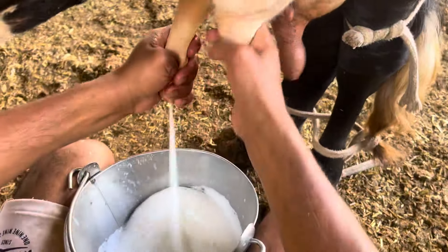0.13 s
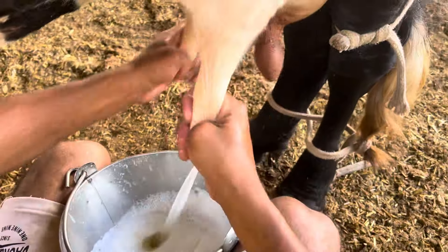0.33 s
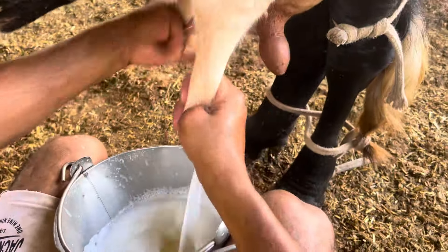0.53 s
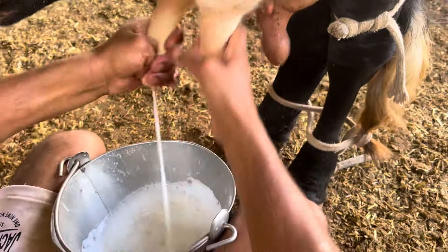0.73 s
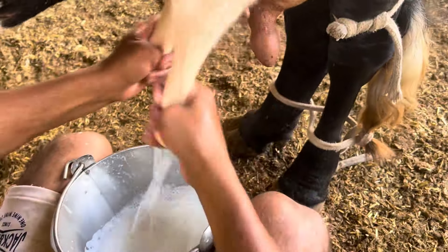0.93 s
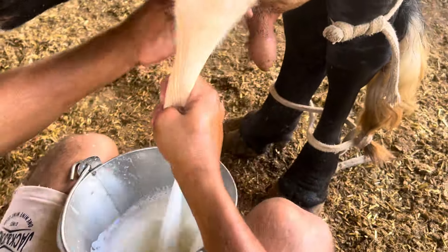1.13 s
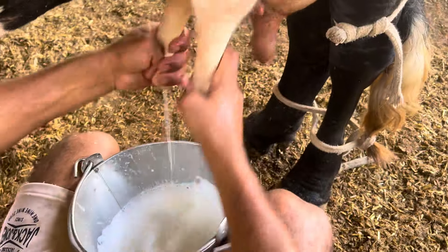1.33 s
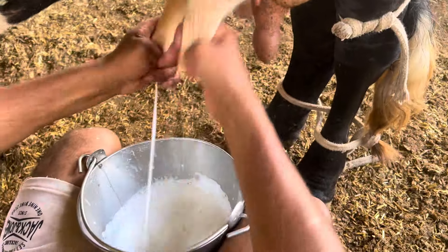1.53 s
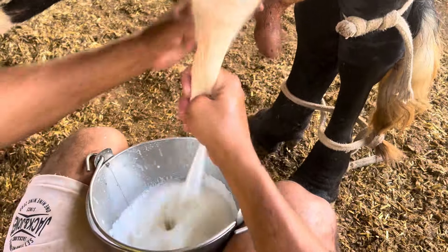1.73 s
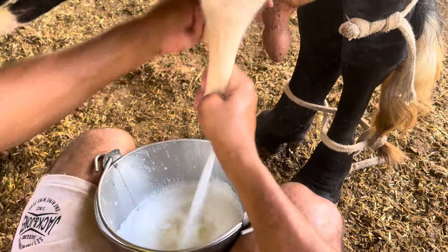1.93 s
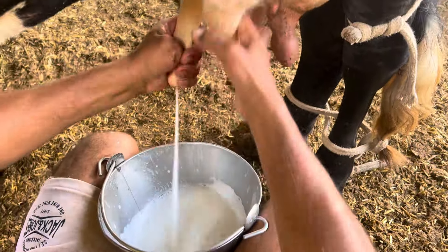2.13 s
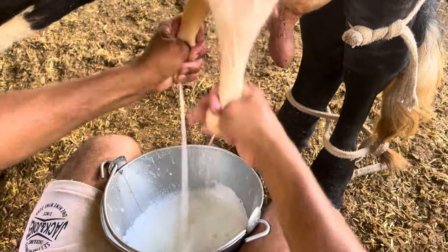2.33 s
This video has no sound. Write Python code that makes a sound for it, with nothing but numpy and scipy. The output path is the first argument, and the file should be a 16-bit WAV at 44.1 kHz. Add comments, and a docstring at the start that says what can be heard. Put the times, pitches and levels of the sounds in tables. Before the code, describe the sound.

Milk jets squirt by hand into a frothy steel pail, fizzing and gurgling in steady alternating spurts

```python
"""The fizz of a milk jet in froth comes first, with a brief graze on steel: a cow is milked by hand into a pail.
Two hands take turns; droplets, bursting bubbles and ticks are shaped noise and damped tones.
Air dragged into the milk gurgles and plops as damped sines of rising pitch; slaps are short noise bursts.
A few thin chirps, a faint ring of metal and soft thuds are sines, over low murmuring air of filtered noise.
"""
import sys
import numpy as np
from scipy import signal
from scipy.fft import rfft, irfft, next_fast_len
from scipy.io import wavfile
from scipy.ndimage import uniform_filter1d

SR = 44100
rng = np.random.default_rng(int(sys.argv[2]) if len(sys.argv) > 2 else 0)


def bounce(signal):
    """Save signal as a 16-bit WAV file at the path given by the first command-line argument."""
    frames = np.transpose(np.atleast_2d(signal))
    limited = np.clip(frames, -1, 1)
    pcm = np.round(limited * 32767).astype(np.int16)
    wavfile.write(sys.argv[1], SR, pcm)


N = 108706
T = np.arange(N) / SR
SIZE = 2 * next_fast_len(N // 2 + SR // 4)  # padded transform length
HZ = np.maximum(np.arange(SIZE // 2 + 1) * SR / SIZE, 1)

# Jets of each hand. Each row: start in seconds, squeeze in seconds, fizz level in dB, gurgle level in dB.
LEFT_JETS = [(-.03, 0.23, -26.5, -35.5), (0.679, 0.17, -29, -31.5), (1.365, 0.13, -28.5, -35),
             (2.078, 0.21, -29, -31.5)]
RIGHT_JETS = [(.28, 0.22, -27.5, -30.5), (.935, 0.22, -27.5, -31.5), (1.635, 0.25, -27.5, -32.5),
              (2.37, .25, -30, -30)]
# Each grip: attack in seconds, seconds for the fizz to fall 20 dB, seconds for the gurgle to fall 20 dB,
# share of the jet that is there at once.
LEFT_GRIP = (0.062, 0.12, 0.2, 0.22)
RIGHT_GRIP = (0.13, 0.14, 0.15, 0.27)
RELEASE_BEND = 1.57  # exponent; above 1, the jet dies ever faster

# Colour of each hand's fizz. Each row: frequency in Hz, relative level in dB.
LEFT_FIZZ = [(300, -16.5), (780, -2), (960, -6.5), (1200, -6.5), (1450, -6), (1750, -2.5), (2100, -11),
             (2600, -0.5), (3200, -7.5), (4200, -5), (5500, -3), (6900, -3.5), (8400, 0)]
RIGHT_FIZZ = [(300, 0), (780, -7), (960, 2), (1200, 0.5), (1450, -3.5), (1750, -6), (2100, -1.5),
              (2600, -5), (3200, -3), (4200, -1), (5500, 1.5), (6900, 0), (8400, 3.5)]
DROPS_PER_S, DROP_SPREAD_DB = 8000, 4
SPUTTER_DB, SPUTTER_HZ = 1.5, 57  # depth and corner rate of the clumping
FROTH_DB, FROTH_HZ = 2, 12  # depth and corner rate of the swell in each band

# Small bubbles that ring as they burst in the froth; level relative to the droplets
BURSTS_PER_S, BURST_DB, BURST_SPREAD_DB = 700, -6, 3
BURST_T60_S, BURST_LOW_HZ, BURST_HIGH_HZ = 0.13, 817, 4518
# Stray drops that tick in the foam; level relative to the droplets, rise as for BUBBLE_RISE
TICKS_PER_S, TICK_DB, TICK_SPREAD_DB = 170, -9.5, 3
TICK_LOW_HZ, TICK_HIGH_HZ, TICK_CYCLES, TICK_RISE = 1300, 6000, 12, 0.15

# Colour of the spit that opens a left-hand jet. Each row: frequency in Hz, relative level in dB.
SPIT_COLOUR = [(500, -12), (2000, -4), (8500, 0)]
SPIT_DB, SPIT_T60_S = -39, 0.025

# The first jet grazes the steel wall. The row: start in seconds, length in seconds, level in dB.
GRAZE = (0.017, 0.16, -33)
# The band the graze stirs. Each row: frequency in Hz, relative level in dB.
GRAZE_COLOUR = [(1800, -17), (2300, -5), (2560, 6), (2900, 0), (3400, -12), (4500, -31)]

# Steel wall modes stirred by the spray. Each row: frequency in Hz, relative level in dB, T60 in seconds.
WALL_MODES = [(956, -8, 0.11), (1047, -5, 0.13), (1769, -2, 0.16), (2312, -10.5, 0.059),
              (2452, -16.5, 0.062), (2600, -2, 0.63), (4080, -2, 0.43)]
PAIL_T60_S, PAIL_ECHO_DB = 0.15, -5

# Air in the pail, colouring the bubbles. Each row: frequency in Hz, relative level in dB.
PAIL_AIR = [(90, -4), (140, -21.5), (171, -1.5), (200, -15), (240, -2.5), (287, 2.5), (345, -3.5),
            (410, -1), (460, -2), (520, -2), (620, -10.5), (760, -20), (1200, -34)]
GURGLE_LAG_S = 0.0051  # the gurgle follows the jet
BUBBLES_PER_S, BUBBLE_SPREAD_DB = 1300, 5
BUBBLE_CYCLES = 7.4  # life of a bubble in cycles of its starting pitch
BUBBLE_RISE = 0.079  # half the fractional rise in pitch over that life

# Large trapped bubbles. Each row: start in seconds, starting pitch in Hz, level in dB.
PLOPS = [(0.073, 270, -14), (0.152, 460, -14.5), (0.426, 380, -30), (0.536, 270, -17.5), (0.749, 508, -9),
         (.7485, 690, -15.5), (0.754, 285, -17), (0.776, 370, -14), (.778, 268, -19.5), (0.794, 276, -17),
         (0.816, 283, -19.5), (0.838, 288, -24), (1.094, 288, -16), (1.405, 470, -19), (1.451, 247, -15.5),
         (1.503, 252, -22), (2.191, 268, -17.5), (2.25, 485, -11), (2.425, 300, -19)]
PLOP_CYCLES, PLOP_RISE = 12.7, 0.25  # as for the bubbles

# Sharp slaps of milk on the surface. Each row: start in seconds, level in dB.
SLAPS = [(.049, -29), (0.715, -18), (.724, -29), (0.7457, -21), (0.757, -26), (.778, -27), (1.0466, -27),
         (1.165, -34), (1.415, -29), (1.4508, -22.5), (1.4956, -16.5), (1.5, -17), (1.54, -27.5),
         (1.585, -31), (1.814, -27), (2.108, -33)]
# Colour of the slaps. Each row: frequency in Hz, relative level in dB.
SLAP_COLOUR = [(300, -4.5), (750, -13.5), (1200, -8), (1800, 3.5), (2600, -1.5), (3400, 4), (4500, -22),
               (12000, -13)]
SLAP_T60_S, SLAP_ATTACK_S, SLAP_ECHO_DB = 0.021, 0.0008, -7

# Thin chirps. Each row: start in seconds, length in seconds, start, middle and end pitch in Hz, level in dB.
CHIRPS = [(.534, .022, 5640, 5720, 5900, -29), (.565, .016, 4500, 4530, 4480, -32.5),
          (.611, .044, 3650, 4520, 5050, -40), (.642, .018, 4020, 3800, 3680, -44),
          (.648, .018, 5050, 4850, 4600, -45)]
# Echoes of the chirps. Each row: delay in seconds, relative level in dB.
CHIRP_ECHOES = [(.019, -14), (.034, -13)]
CHIRP_WAVER, CHIRP_FLUTTER_DB = 0.012, 2  # spread of pitch (fraction) and of level

# Two close modes of a piece of metal. Each row: frequency in Hz, relative level in dB, T60 in seconds.
RING_MODES = [(4206, -7, 1.2), (4250, 0, .35)]
# Light touches that set it ringing. Each row: start in seconds, level in dB.
RINGS = [(0, -43), (.5, -50), (1.314, -42), (1.578, -46)]
RING_ATTACK_S = 0.008

# Soft thuds. Each row: start in seconds, level in dB.
THUDS = [(0.85, -28.5), (0.914, -33), (0.949, -37), (1.002, -39)]
THUD_HZ, THUD_S = 69.7, 0.062

# Colour of the yard's air. Each row: frequency in Hz, relative level in dB.
YARD = [(25, -42), (45, -14.5), (68, 5), (120, 2), (300, -1), (520, -1.5), (800, -17.5), (2000, -15.5),
        (5000, -24.5), (15000, -40)]
YARD_DB = -47

# Likeness of the two microphones. Each row: frequency in Hz, correlation from 0 to 1.
LIKENESS = [(300, 1), (600, 1), (900, 0.53), (3000, 0.15), (4200, 0.84), (6500, 0.16), (8500, 1),
            (15000, 1)]
# Balance of the two microphones. Each row: frequency in Hz, left minus right in dB.
BALANCE_DB = [(500, -1), (950, 5.5), (1400, 0.5), (2600, 3), (4000, 3), (5200, 7.5), (6800, 10.5),
              (7800, 0), (15000, -0.5)]
# Phase between the two microphones. Each row: frequency in Hz, lead of the left in radians.
PORT_PHASE = [(150, 0), (500, .55), (750, 1.4), (1000, .5), (1700, 1.9), (2700, 1.4), (3600, .2),
              (6000, .5), (7300, 1.1), (8500, 0), (9400, -1.2), (10000, -2.8), (10700, -3.5), (11500, -5.6),
              (12800, -7), (13400, -9), (14200, -9.8), (15300, -12.2)]
# Treble response of the microphones. Each row: frequency in Hz, gain in dB.
TREBLE = [(8500, 0), (10200, -5), (11300, -8), (12500, -9), (15500, -8)]
CUTOFF_HZ = 15900


def amp(db):
    """A level in decibels is a logarithmic measure of amplitude gain."""
    return 10 ** (np.asarray(db) / 20)


def unit(x):
    """Root-mean-square normalisation gives every signal the same power."""
    return x / np.sqrt(np.mean(x ** 2) + 1e-20)


def decay(t, t60):
    """Exponential damping: the amplitude falls by 60 dB in t60."""
    return np.exp(-np.log(1000) * t / t60)


def across(points):
    """Interpolation on a logarithmic frequency axis extends (Hz, value) rows to every frequency."""
    hz, value = np.transpose(points)
    return np.interp(np.log(HZ), np.log(hz), value)


def colour(x, points):
    """Minimum-phase filtering: a folded cepstrum gives a causal response of unit power gain."""
    gain = amp(across(points))
    cepstrum = irfft(np.log(unit(gain)))
    cepstrum[1:SIZE // 2] *= 2
    cepstrum[SIZE // 2 + 1:] = 0
    response = np.exp(rfft(cepstrum))
    return irfft(rfft(x, SIZE) * response)[..., :N]


def drift(rate):
    """Low-passed noise is a slow random fluctuation, here of unit spread; rate is the corner in Hz."""
    noise = rfft(rng.standard_normal(SIZE))
    return unit(irfft(noise / (1 + (HZ / rate) ** 2))[:N])


def add(out, s, sound):
    """Superposition: a sound adds linearly to the mix from its start time."""
    i = int(np.clip(s * SR, 0, N))
    out[i:i + len(sound)] += sound[:N - i]


def flow(jets, grip, release, lag, axis):
    """Powers of successive jets add; each builds, holds and dies. Axis picks the level column."""
    power, attack, first = 0, grip[0], np.clip(grip[3], 0, 1)
    for row in jets:
        t = T - row[0] - lag
        build = np.sin(np.pi / 2 * np.clip(t / attack, 0, 1)) ** 2
        rise = (t > 0) * (first + (1 - first) * build)
        fall_db = 20 * (np.maximum(t - row[1], 0) / release) ** RELEASE_BEND
        power = power + (rise * amp(row[axis] - fall_db)) ** 2
    return np.sqrt(power)


def bubble(hz, cycles, rise):
    """A bubble is a damped oscillator whose pitch rises as it nears the surface."""
    t = T[:int(cycles / hz * SR)]
    age = t * hz / cycles
    tone = np.sin(2 * np.pi * hz * t * (1 + rise * age))
    onset = 1 - np.exp(-2 * hz * t)
    return tone * decay(age, 1) * onset


def pail(x):
    """Reverberation: reflections from steel walls and moving froth smear power into a decaying wash."""
    keep = np.exp(-2 * np.log(1000) / (PAIL_T60_S * SR))
    power = signal.lfilter([1 - keep], [1, -keep], x ** 2 + 1e-18)
    return np.sqrt(power) * rng.standard_normal(N)


def in_pail(x, spectrum):
    """A spray splits into a direct and a diffuse field, both coloured by where it lands."""
    echo = amp(PAIL_ECHO_DB)
    direct = (x + echo * pail(x)) / np.hypot(1, echo)
    return colour(np.array([direct, pail(x)]), spectrum)


def fizz(jets, grip, spectrum):
    """Impulsive noise: the jet breaks into droplets that burst the froth in sputtering clumps."""
    spread_db = DROP_SPREAD_DB * np.minimum(rng.exponential(1, N), 4)
    sizes = amp(spread_db) * rng.choice([-1, 1], N)
    landed = rng.random(N) < DROPS_PER_S / SR
    drops = unit(sizes * landed * amp(SPUTTER_DB * drift(SPUTTER_HZ)))
    level = flow(jets, grip, grip[1], 0, axis=2) / np.hypot(1, amp(BURST_DB))
    # Independent spatter for the direct and the diffuse field
    spatter = np.array([amp(BURST_DB) * bursts() + amp(TICK_DB) * ticks() for _ in range(2)])
    return in_pail(level * drops, spectrum) + colour(level * spatter, spectrum)


def bursts():
    """Free vibration: small bubbles pop in the froth, each with a brief damped note of its own."""
    out, t = np.zeros(N), T[:SR // 20]  # each note stops after 50 ms
    envelope = decay(t, BURST_T60_S)
    for k, (pitch, size, delay) in enumerate(rng.random((N // 16, 3))):
        s = (k + delay) / BURSTS_PER_S
        if s < T[-1]:
            hz = BURST_LOW_HZ + (BURST_HIGH_HZ - BURST_LOW_HZ) * pitch
            level = amp(-BURST_SPREAD_DB * np.log(size + 0.02))
            add(out, s, level * envelope * np.sin(2 * np.pi * hz * t))
    return unit(out)


def ticks():
    """Bubble resonance: stray drops land one by one, each a tiny wet tick that rises in pitch."""
    out = np.zeros(N)
    for when, pitch, size in rng.random((int(TICKS_PER_S * N / SR), 3)):
        hz = TICK_LOW_HZ * (TICK_HIGH_HZ / TICK_LOW_HZ) ** pitch
        level = np.sqrt(hz) * amp(-TICK_SPREAD_DB * np.log(size + 0.04))
        add(out, when * N / SR, level * bubble(hz, TICK_CYCLES, TICK_RISE))
    return unit(out)


def froth(x):
    """Band-wise modulation: each narrow band swells and sinks on its own as the foam shifts."""
    centres = np.geomspace(700, 11000, 24)  # Hz
    spectrum = rfft(x, SIZE)
    out = 0
    for pick in np.eye(len(centres)):
        band = irfft(spectrum * across(list(zip(centres, pick))))[:, :N]
        out = out + band * amp(FROTH_DB * drift(FROTH_HZ))
    return out


def spits():
    """Transient noise: a left-hand jet that starts after time zero spits as its tip meets the foam."""
    out, t = np.zeros(N), T[:SR // 20]
    for s, *_ in LEFT_JETS:
        if s > 0:
            add(out, s, amp(SPIT_DB) * rng.standard_normal(len(t)) * decay(t, SPIT_T60_S))
    return colour(out, SPIT_COLOUR)


def graze():
    """Band-limited excitation: spray on the bare wall is a swell of noise in its own band."""
    s, length, db = GRAZE
    level = amp(db) * np.sin(np.pi * np.clip((T - s) / length, 0, 1))
    return in_pail(level * rng.standard_normal(N), GRAZE_COLOUR)


def walls(x):
    """Modal resonance: spray drives the steel, which rings faintly at its own pitches."""
    out = 0
    for k, (hz, db, t60) in enumerate(WALL_MODES):
        r = decay(1 / SR, t60)
        zeros = [(1 - r * r) / 2, 0, (r * r - 1) / 2]
        poles = [1, -2 * r * np.cos(2 * np.pi * hz / SR), r * r]
        out = out + (-1) ** k * 2 * amp(db) * signal.lfilter(zeros, poles, x)
    return out


def gurgle():
    """Volume resonance: air dragged under by the jets rings as a crowd of bubbles."""
    crowd = np.zeros(N)
    starts = np.arange(N // 20) / BUBBLES_PER_S
    for s, (pitch, size, chance) in zip(starts, rng.random((N // 20, 3))):
        hz = 130 + 700 * pitch
        level = np.sqrt(hz) * amp(-BUBBLE_SPREAD_DB * np.log(size + 0.077))
        sign = np.sign(chance - 0.5)
        add(crowd, s + chance / 100, level * sign * bubble(hz, BUBBLE_CYCLES, BUBBLE_RISE))
    left = flow(LEFT_JETS, LEFT_GRIP, LEFT_GRIP[2], GURGLE_LAG_S, axis=3)
    right = flow(RIGHT_JETS, RIGHT_GRIP, RIGHT_GRIP[2], GURGLE_LAG_S, axis=3)
    crowd = colour(crowd, PAIL_AIR)
    # Even out the crowd's own power so that the jets set the level
    crowd_rms = np.sqrt(uniform_filter1d(crowd ** 2, size=SR // 12) + 1e-12)
    return np.hypot(left, right) * crowd / crowd_rms


def plops():
    """Single-bubble resonance: the jet punches through the froth and traps one large bubble."""
    out = np.zeros(N)
    for s, hz, db in PLOPS:
        add(out, s, amp(db) * bubble(hz, PLOP_CYCLES, PLOP_RISE))
    return out


def slaps():
    """Impact noise: a slug of milk smacks the surface, a short crack and a faint wash from the pail."""
    out, t = np.zeros(N), T[:SR // 20]
    envelope = decay(t, SLAP_T60_S) * (1 - np.exp(-t / SLAP_ATTACK_S))
    for s, db in SLAPS:
        add(out, s, amp(db) * rng.standard_normal(len(t)) * envelope)
    return colour(out + amp(SLAP_ECHO_DB) * pail(out), SLAP_COLOUR)


def chirps():
    """Frequency modulation: thin wavering glides bend on their way, with two weak echoes from the yard."""
    out, waver = np.zeros(N), 1 + CHIRP_WAVER * drift(200)
    for s, length, *pitches, db in CHIRPS:
        n = int(length * SR)
        hz = np.interp(np.arange(n), [0, n / 2, n], pitches) * waver[int(s * SR):][:n]
        level = amp(db + CHIRP_FLUTTER_DB * drift(150)[:n]) * np.sqrt(np.hanning(n))
        note = level * np.sin(2 * np.pi * np.cumsum(hz) / SR)
        add(out, s, note)
        for delay, echo_db in CHIRP_ECHOES:
            add(out, s + delay, amp(echo_db) * note)
    return out


def metal_ring():
    """Beating: two close modes of a lightly touched piece of metal interfere as they decay."""
    out, ring = np.zeros(N), 0
    for hz, db, t60 in RING_MODES:
        ring = ring + amp(db) * np.sin(2 * np.pi * hz * T) * decay(T, t60)
    for s, db in RINGS:
        add(out, s, amp(db) * ring * (1 - np.exp(-T / RING_ATTACK_S)))
    return out


def thuds():
    """A low tone under a smooth window has no sharp edge and is heard as a soft thud."""
    out, n = np.zeros(N), int(THUD_S * SR)
    thud = np.hanning(n) * np.sin(2 * np.pi * THUD_HZ * T[:n])
    for s, db in THUDS:
        add(out, s, amp(db) * thud)
    return out


def yard_air():
    """Stationary noise: the yard's air is a low murmur, independent in the direct and diffuse fields."""
    return amp(YARD_DB) * colour(rng.standard_normal((2, N)), YARD)


def microphones(direct, diffuse):
    """Partial coherence: two ports differ in level and phase, and share the direct sound more."""
    alike = np.clip(across(LIKENESS), 0, 1)
    sign = np.array([[1], [-1]])  # left, right
    shared = np.sqrt((1 + alike) / 2) * rfft(direct, SIZE)
    opposed = sign * np.sqrt((1 - alike) / 2) * rfft(diffuse, SIZE)
    lean = amp(sign * across(BALANCE_DB) / 2)
    lean = lean / np.sqrt(np.mean(lean ** 2, axis=0))
    phase = np.exp(0.5j * sign * across(PORT_PHASE))
    return irfft((shared + opposed) * lean * amp(across(TREBLE)) * phase)[:, :N]


def scene():
    """Superposition of fields: milk in the pail, close by, over the low murmur of the yard's air."""
    jets = fizz(LEFT_JETS, LEFT_GRIP, LEFT_FIZZ) + fizz(RIGHT_JETS, RIGHT_GRIP, RIGHT_FIZZ)
    impacts = np.array([slaps() + spits() for _ in range(2)])
    spray = froth(jets) + impacts + graze()
    direct, diffuse = spray + walls(spray[::-1])  # direct spray rings into the diffuse field, and back
    bubbles = plops() + gurgle()
    small_sounds = chirps() + metal_ring() + thuds()
    air = yard_air()
    direct = direct + bubbles + small_sounds + air[0]
    diffuse = diffuse + colour(pail(bubbles), PAIL_AIR) + air[1]
    return microphones(direct, diffuse)


def record(dry):
    """Band limiting: an elliptic low-pass cuts the top steeply."""
    lowpass = signal.ellip(12, 0.1, 80, CUTOFF_HZ, fs=SR, output="sos")
    return signal.sosfilt(lowpass, dry)


dry = scene()
out = record(dry)
bounce(out)
```